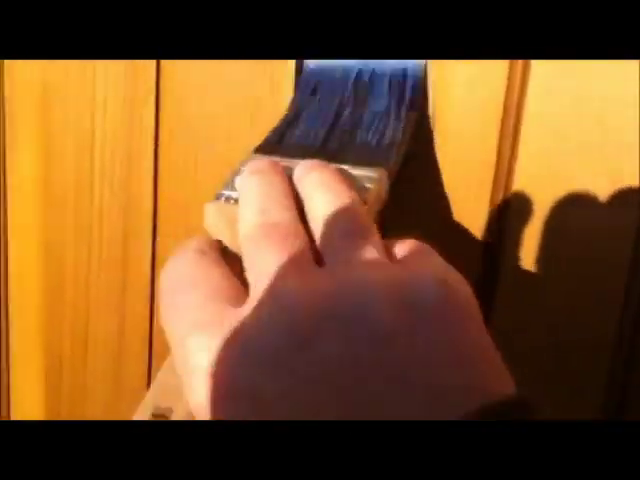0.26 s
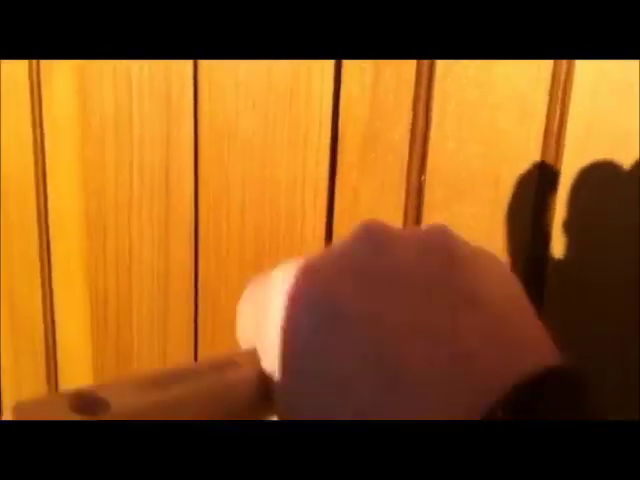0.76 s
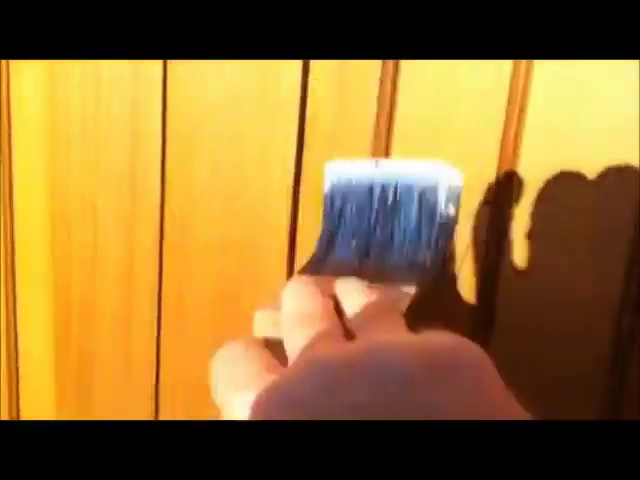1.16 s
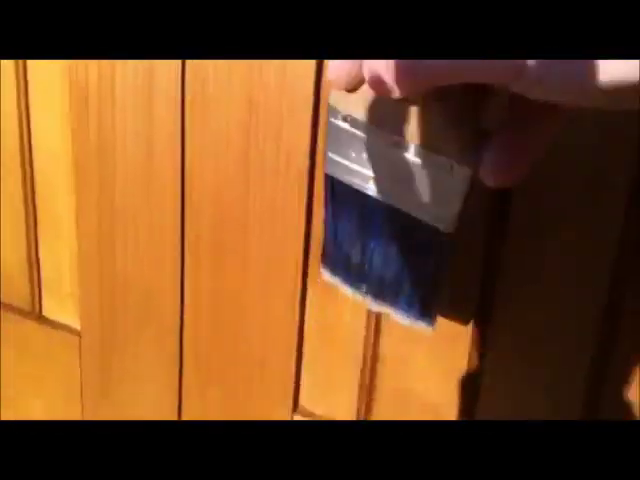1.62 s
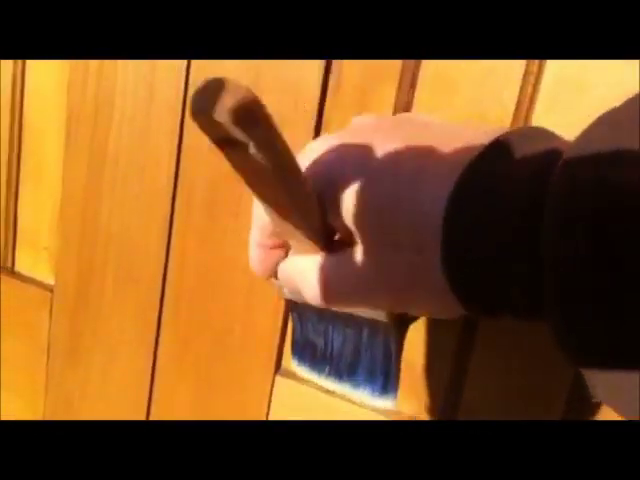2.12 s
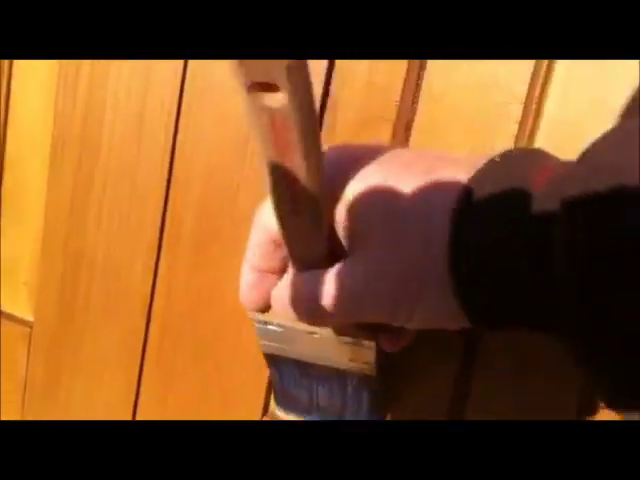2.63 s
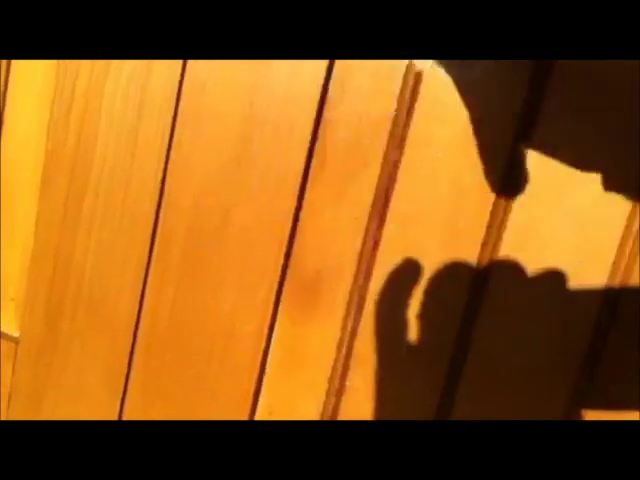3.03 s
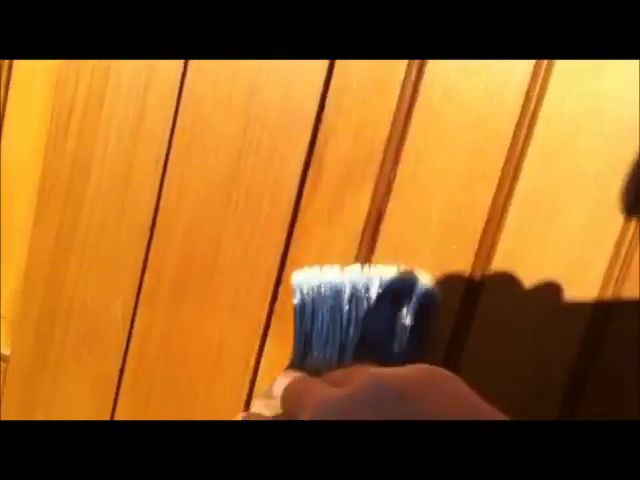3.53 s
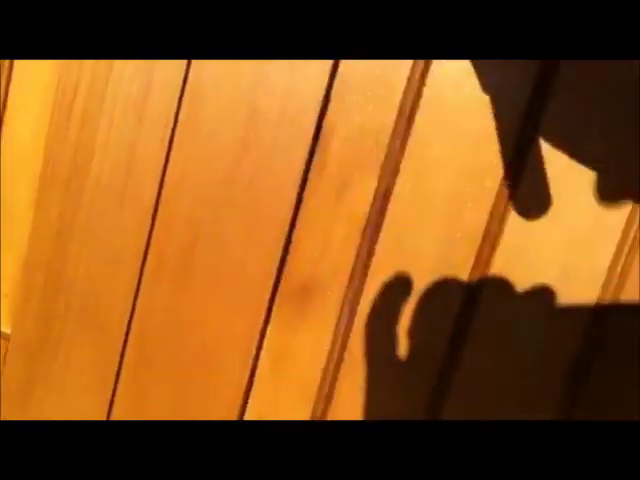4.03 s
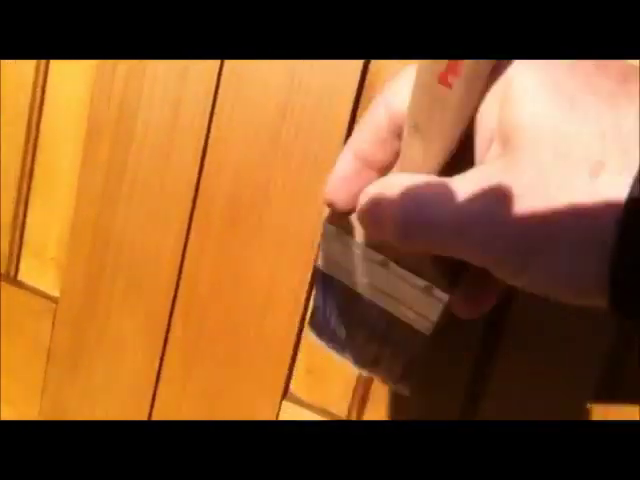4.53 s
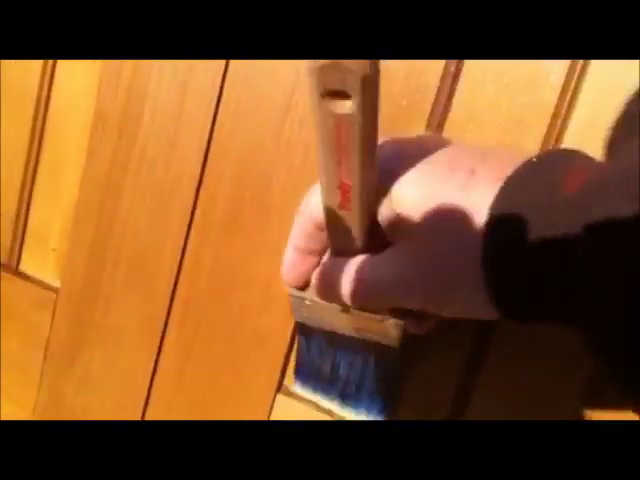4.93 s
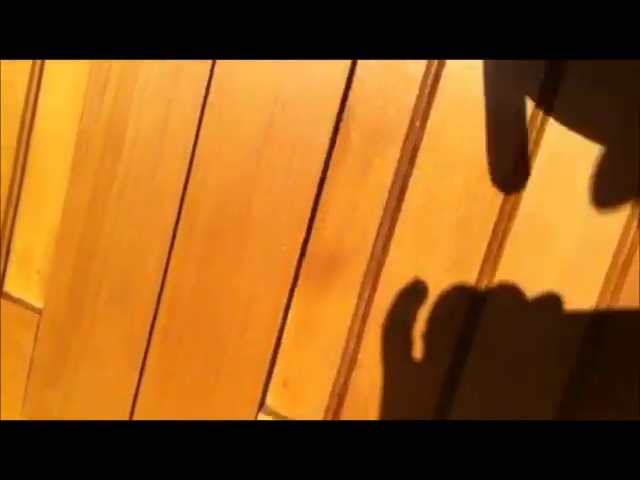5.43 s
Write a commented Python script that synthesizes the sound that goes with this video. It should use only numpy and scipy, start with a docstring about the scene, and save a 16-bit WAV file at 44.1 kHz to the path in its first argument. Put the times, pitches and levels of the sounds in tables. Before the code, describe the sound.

Close to a camera microphone outdoors, a wide brush strokes wooden boards in airy, scratchy swishes of about a third of a second. After three strokes comes a pause with rustling, a sharp metal tick, a soft bump and a tiny bird chirp. More strokes follow, with dabs and hollow bumps, then another light rustle and a last stroke cut off at the end. Low rumble and hiss stay faint underneath.

```python
"""A wide brush paints wooden wall boards outdoors, close to a camera microphone; far rumble and air hiss throughout.
0-1.6 s: a stroke's tail, then strokes: slips of bristle tips heard via tips, bristle bundle and board.
1.5-2.3 s: light rustle of sparse slips, metal ticks and wall bumps (decaying modes), a faint bird (sine glides).
2.3-4.6 s: more strokes, with dabs, bumps and shifts between.
4.6-5.66 s: rustle, bird, a bump and a dab, then a last stroke that runs to the end."""
import sys
import numpy as np
from scipy import signal
from scipy.fft import rfft, irfft, next_fast_len
from scipy.io import wavfile
from scipy.ndimage import uniform_filter1d, map_coordinates

SR = 44100
rng = np.random.default_rng(int(sys.argv[2]) if len(sys.argv) > 2 else 0)


def bounce(signal):
    """Save signal as a 16-bit WAV file at the path given by the first command-line argument."""
    frames = np.transpose(np.atleast_2d(signal))
    limited = np.clip(frames, -1, 1)
    pcm = np.round(limited * 32767).astype(np.int16)
    wavfile.write(sys.argv[1], SR, pcm)


N = 249606

# air and microphone hiss spectrum: (frequency [Hz], density [dB per Hz])
AIR_SPECTRUM = [(40, -43), (70, -34), (110, -13), (200, -18), (430, -17), (510, -5), (1200, -7),
                (2240, -10.5), (6000, -13), (15700, -13)]
# far rumble, mean level: (time [s], level [dB])
RUMBLE_LEVEL = [(0, -68.5), (.69, -73), (1.31, -68.5), (1.8, -66), (2.28, -69.5), (2.74, -70.5),
                (2.96, -57.5), (3.2, -70.5), (3.86, -66), (4.2, -72.5), (4.75, -68.5), (5.66, -66)]
# far rumble spectrum: (frequency [Hz], density [dB per Hz])
RUMBLE_SPECTRUM = [(65, -22), (100, -10), (155, -0.5), (200, 0.5), (280, -4.5), (400, -3.5), (800, -23.5)]
# bird whistles: (time [s], length [s], start [Hz], end [Hz], peak level [dB])
BIRD_CHIRPS = [(1.973, .045, 3620, 3600, -72), (2.013, .04, 4850, 4600, -62),
               (4.755, .065, 5550, 6100, -70), (4.82, .055, 7950, 8650, -66),
               (4.823, .035, 4000, 4250, -75), (4.865, .08, 4580, 4750, -74)]
# ticks of the metal band: (time [s], nominal level [dB])
TICK_EVENTS = [(1.675, -47), (1.704, -48), (1.815, -28.5)]
# metal band modes: (frequency [Hz], mean level [dB], t60 [s])
FERRULE_MODES = [(1150, -12, 0.0073), (1690, -10, 0.0061), (3400, 8, 0.0028), (5000, -6, .004),
                 (7900, -3, 0.0028)]
# wall bumps: (time [s], nominal level [dB], lowest ring [Hz], hardness [dB per octave])
BUMP_EVENTS = [(0.384, -54, 196, -11), (0.809, -43.5, 200, -13), (2.057, -49, 276, -2),
               (2.725, -35, 157.4, -1), (2.746, -34, 169, -10), (2.852, -46.5, 280, 0.5),
               (2.98, -47, 158.7, 2), (3.1, -40, 140.5, -9), (3.784, -44, 276, -0.5), (4.944, -47, 266, -8)]
# hollow wall modes: (ratio to the lowest ring, mean level before hardness [dB], t60 [s])
WALL_MODES = [(1, -12, 0.2), (1.25, 3, 0.089), (1.9, -2, 0.11), (2.6, 0, 0.081), (3.7, -1, 0.1)]
# rustle of each brush shift: (time [s], level [dB])
SHIFT_LEVELS = [
    [(1.54, -60), (1.56, -62), (1.708, -56.5), (1.808, -61.5), (1.83, -64), (1.944, -68.5), (2.05, -69)],
    [(2.14, -61), (2.155, -60), (2.23, -58), (2.27, -76)],
    [(2.729, -54), (2.745, -56), (2.85, -61)],
    [(4.2, -55), (4.25, -78), (4.3, -62)],
    [(4.6, -76), (4.71, -65.5), (4.754, -69), (4.94, -63)],
    [(5.03, -58.5), (5.05, -63), (5.13, -57.5), (5.196, -59), (5.29, -60)],
]
# each shift, at its peak, re its rustle: (scratch [dB], treble [dB])
SHIFT_COLOURS = [(1, -2.5), (-4, 1), (-2.5, 1.5), (-7, -7), (-4.5, -6), (-1, 0)]
# rustle, its scratch and its treble: (frequency [Hz], density [dB per Hz])
RUSTLE_SPECTRUM = [(180, -25), (300, -3), (490, -2.5), (600, -4.5), (1150, -4.5), (1480, -13), (1890, -4.5),
                   (2600, -7), (3030, -19), (4000, -48)]
SCRATCH_SPECTRUM = [(2300, -45), (3050, -8), (3700, 2), (4200, 1.5), (4900, 0.5), (6100, -5), (6800, -25),
                    (8800, -50)]
TREBLE_SPECTRUM = [(5000, -47), (6800, -4), (8500, -3), (12000, -3), (15700, -7.5)]
# pressure of each stroke, heard as tip hiss: (time [s], level [dB], finest tips re hiss [dB])
STROKE_LEVELS = [
    [(0.0, -49, 7), (0.008, -49, 4), (0.036, -54.5, 5), (0.054, -69, 5), (0.1, -71, -5)],
    [(0.405, -56.5, 2.5), (0.483, -42.5, 3.5), (0.555, -39, 3.5), (0.725, -51, 7.5), (0.747, -54.5, 8),
     (0.79, -86, -1)],
    [(0.812, -57.5, 6), (0.826, -53, 7.5), (0.904, -45.5, 5), (1.038, -48.5, 5.5), (1.08, -58, 8.5),
     (1.13, -87, 6)],
    [(1.2, -60, 3), (1.228, -55, 7), (1.292, -45.5, 4), (1.38, -45, 5), (1.454, -50, 6), (1.506, -49, 6),
     (1.532, -54, 7), (1.554, -66, 3), (1.57, -72, 0)],
    [(2.25, -65, -3), (2.324, -49, -5.5), (2.358, -48.5, 3), (2.392, -47, 2.5), (2.44, -60.5, 5),
     (2.462, -61, 6), (2.5, -82, 8)],
    [(2.83, -72, 1), (2.88, -51, -7), (2.988, -46.5, 4), (3.08, -45.5, 4.5), (3.292, -51, 4.5),
     (3.324, -59.5, 7), (3.38, -87, 4)],
    [(3.41, -84, 9), (3.434, -60, 0), (3.46, -53.5, 6), (3.54, -43, 2.5), (3.644, -44, 4),
     (3.674, -49.5, 5.5), (3.794, -49.5, 4.5), (3.858, -82, 2), (3.87, -61, -4)],
    [(3.87, -73, -5), (3.888, -71, -2), (3.92, -54, 4), (3.96, -49, 3), (3.988, -44.5, 3.5),
     (4.016, -44.5, 5), (4.052, -44.5, 4), (4.174, -51, 4.5), (4.25, -70.5, 0)],
    [(4.25, -69, 3), (4.282, -62, 1), (4.304, -61.5, 3), (4.328, -54, 8), (4.412, -42.5, 3.5),
     (4.506, -48.5, 6), (4.56, -51.5, 5), (4.616, -79, 6), (4.62, -73, 0)],
    [(5.27, -75, -3), (5.284, -67, -4), (5.308, -51, -7), (5.356, -47, 1), (5.472, -45, 4.5),
     (5.66, -50, 5)],
]
# short dabs as the brush is set down: (time [s], level [dB], finest tips re hiss [dB])
DAB_LEVELS = [
    [(0.364, -72, 1), (0.376, -61.5, 1), (0.405, -59.5, 5)],
    [(2.05, -53.5, -2), (2.06, -54, 5.5), (2.122, -57, 6), (2.16, -72, 3)],
    [(2.689, -56, 10), (2.703, -47, 3.5), (2.729, -43.5, 3.5)],
    [(4.94, -56.5, 9), (4.95, -51.5, 5.5), (5.008, -55, 4), (5.03, -66, 2), (5.05, -70, -11)],
]
# each stroke, then each dab; base levels re hiss: (bundle [dB], board face [dB], board body [dB],
# bundle ring at start [Hz], at end [Hz], its base sharpness [dB],
# deepest bristle bend at [s], bend length [s], bend depth [0-2])
GESTURE_COLOURS = [(-6.5, -14.5, -14.5, 2120, 1700, 3.9, 0.047, .03, .5),
                   (-3, -11, -18, 1830, 2080, 4.6, 0.81, .03, 1),
                   (-5.5, -11.5, -18.5, 2030, 2000, 4.3, 0.947, 0.043, 1.5),
                   (-5, -11.5, -16, 2260, 1900, 1.8, 1.33, .05, 0.55),
                   (-2.5, -11.5, -9, 1850, 2160, 4.2, 2.38, .03, 0.5),
                   (-3, -12, -12.5, 1930, 1660, 5.4, 3.17, 0.052, 0.96),
                   (-5, -11.5, -19.5, 1530, 2250, 2.9, 3.63, 0.081, 0.81),
                   (-3.5, -12, -16, 1840, 1750, 4.8, 4.09, .07, 0.94),
                   (-5.5, -13, -17, 1570, 2130, 4, 4.45, 0.043, 1.4),
                   (-4, -10.5, -11.5, 1900, 1750, 6, 5.57, 0.047, 1.8),
                   (2.5, -9, -5.5, 1440, 1620, 13, .378, .02, 1.1),
                   (3, -6.5, -2.5, 1740, 1920, 7.5, 2.11, 0.045, 0.79),
                   (1, -7, -8, 1900, 1780, 7, 2.727, 0.013, 1.2),
                   (1.5, -8, -7, 1740, 1900, 6, 4.945, .02, 1.7)]
# board ring as the brush moves along; each stroke, then each dab:
# (start [Hz], end [Hz], sharpness [dB])
BOARD_SWEEPS = [(900, 900, 2), (690, 900, 3.4), (776, 600, 3.4), (640, 820, 2.5), (620, 1100, 6.6),
                (700, 1300, 7.6), (650, 800, 4), (600, 1400, 2.9), (700, 960, 2.5), (700, 1300, 4.6),
                (700, 600, 2), (600, 620, 4.5), (600, 530, 6.5), (700, 970, 1.6)]
# tips, finest tips, bristle bundle: (frequency [Hz], density [dB per Hz])
TIP_SPECTRUM = [(2000, -68), (2900, -4.5), (3600, 0.5), (4500, 0), (5600, -0.5), (6500, -6.5),
                (8000, -15.5), (12000, -17)]
FINE_TIP_SPECTRUM = [(4500, -32), (6500, -8.5), (8000, -3), (11400, -1.5), (14500, -3), (15700, -7.5)]
BUNDLE_SPECTRUM = [(1000, -44), (1300, -26), (1500, -3.5), (2000, 0), (2650, 1.5), (2950, -10.5),
                   (3600, -27), (6000, -48)]
# board face; board body over its hollow: (frequency [Hz], density [dB per Hz])
FACE_SPECTRUM = [(450, -48), (750, -9.5), (1000, -2), (1350, 3), (1600, -5.5), (2600, -97)]
BODY_SPECTRUM = [(150, -25), (300, -4.5), (450, -3.5), (600, 1.5), (750, -5), (1000, -9), (1800, -63)]

AIR_DB = -65.5
TOP_HZ = 15830
SCRATCH_DB_PER_RUSTLE_DB = 0.6
LANDING_S, LANDING_DB = 0.052, 3  # body boom as the brush lands: 1/e time, initial lift
BODY_LAG_SHARE = 0.37  # share of the pressure swing that the body does not follow
BODY_FADE_DB = 3  # body lost by the end of a stroke
BEND_FACE_DB, BEND_BUNDLE_DB, BEND_SHARP_DB = 3.5, 2.5, 4  # added by a bend of depth 1


def amp(db):
    """Decibels to amplitude."""
    return 10 ** (np.asarray(db) / 20)


def unit(x):
    """Scale to rms 1."""
    return x / np.sqrt(np.mean(x ** 2) + 1e-20)


def filtered(x, response):
    """Multiply the spectrum by response(Hz), zero phase."""
    size = next_fast_len(N + 8192)
    return irfft(rfft(x, size) * response(np.fft.rfftfreq(size, 1 / SR)), size)[..., :N]


def coloured(x, spectrum):
    """Filter through (Hz, dB) points on a log frequency axis, then set rms 1."""
    hz, db = np.transpose(spectrum)
    return unit(filtered(x, lambda f: amp(np.interp(np.log(f + 1), np.log(hz), db))))


def wobble(knots_per_s):
    """Smooth random curve through normal knots."""
    knots = rng.standard_normal(int(N * 200 / SR) + 4)
    return map_coordinates(knots, [np.arange(N) * knots_per_s / SR])


def slips(spike_db, patchy_db):
    """Dense tiny slips of uneven size; bunches of bristles make patches in time and pitch."""
    pops = rng.standard_normal(N) * amp(spike_db * rng.exponential(size=N))
    z = signal.stft(pops, nperseg=256)[2]
    field = uniform_filter1d(rng.standard_normal(z.shape), size=2, axis=0)
    field = uniform_filter1d(field, size=18, axis=1)
    return signal.istft(z * amp(patchy_db * unit(field)), nperseg=256)[1][:N]


def ringing(x, centre_hz, width_oct, lift_db):
    """A moving resonance lifts the band round its centre; the gain is balanced to hold the mean level."""
    hz, t_s, z = signal.stft(x, SR, nperseg=512)
    now = np.minimum((t_s * SR).astype(int), N - 1)
    offset_oct = np.log2((hz[:, None] + 1) / centre_hz[now])
    lift = amp(lift_db[now] * np.exp(-(offset_oct / width_oct) ** 2))
    weight = np.mean(abs(z) ** 2, axis=1, keepdims=True)
    lift = lift / np.sqrt(np.sum(weight * lift ** 2, axis=0) / np.sum(weight))
    return signal.istft(z * lift, SR, nperseg=512)[1][:N]


def played(tables, rows):
    """Per sample: gain, dB below peak (at most 30), seconds and share gone by, row of the latest gesture."""
    t_s = np.arange(N) / SR
    starts, ends = np.array([[table[0][0], table[-1][0]] for table in tables]).T
    order = np.argsort(starts)
    latest = np.searchsorted(starts[order], t_s, side="right") - 1
    now = order[np.maximum(latest, 0)]
    levels = [np.interp(t_s, *np.transpose(table)[:2], left=-200, right=-200) for table in tables]
    level_db = np.max(levels, axis=0)
    peak_db = np.array([np.max(table, axis=0)[1] for table in tables])[now]
    below_db = np.minimum(peak_db - level_db, 30)
    since_s = np.maximum(t_s - starts[now], 0)
    gone = np.minimum(since_s / (ends - starts)[now], 1)
    gain = uniform_filter1d(amp(level_db), size=130)  # 3 ms smoothing
    return gain, below_db, since_s, gone, np.array(rows)[now].T


def outdoors():
    """Steady air and microphone hiss under a wavering low rumble, both shaped noise."""
    time_s, db = np.transpose(RUMBLE_LEVEL)
    level_db = np.interp(np.arange(N) / SR, time_s, db) + 1.5 * wobble(7)
    rumble = amp(level_db) * coloured(rng.standard_normal(N), RUMBLE_SPECTRUM)
    return rumble + amp(AIR_DB) * coloured(slips(spike_db=1.2, patchy_db=0.0), AIR_SPECTRUM)


def bird():
    """Short far whistles: sines gliding linearly in frequency under a Hann envelope."""
    out = np.zeros(N + SR)
    for time_s, length_s, from_hz, to_hz, db in BIRD_CHIRPS:
        n = int(length_s * SR)
        cycles = np.cumsum(np.linspace(from_hz, to_hz, n)) / SR
        out[round(time_s * SR):][:n] += amp(db) * np.hanning(n) * np.sin(2 * np.pi * cycles)
    return out[:N]


def blow(db, modes, rise_s):
    """One blow rings decaying modes, each at a new random strength."""
    t_s = np.arange(SR // 4) / SR
    ring = 0
    for hz, level_db, t60_s in modes:
        decay_db = level_db + rng.normal(0, 1.5) - 60 * t_s / t60_s
        ring = ring + amp(decay_db) * np.sin(2 * np.pi * hz * t_s)
    return amp(db - 7) * ring * (1 - np.exp(-t_s / rise_s))


def knocks():
    """Dry ticks of the metal band and soft bumps on the hollow wall, as struck modes."""
    out = np.zeros(N + SR)
    for time_s, db in TICK_EVENTS:
        start = round(time_s * SR)
        out[start:][:SR // 4] += blow(db, FERRULE_MODES, rise_s=.00004)
        out[start + 2:][:2] += amp(db + 2.0) * np.array([1, -.4])  # broadband contact snap
    for time_s, db, low_hz, hard_db in BUMP_EVENTS:
        # a harder bump reaches the higher modes
        modes = [(low_hz * k, level + hard_db * np.log2(k), t60_s) for k, level, t60_s in WALL_MODES]
        out[round(time_s * SR):][:SR // 4] += blow(db, modes, rise_s=0.0019)
    # small bodies radiate no deep bass
    return filtered(out[:N], lambda hz: hz ** 2 / (hz ** 2 + 60 ** 2))


def shifts():
    """A sparser, spikier rustle of slips while the brush barely touches; the louder, the brighter."""
    gain, below_db, _, _, (scratch_db, treble_db) = played(SHIFT_LEVELS, SHIFT_COLOURS)
    rub = slips(spike_db=2.2, patchy_db=1.5) * amp(0.68 * wobble(45))
    scratch = amp(scratch_db) * coloured(rub, SCRATCH_SPECTRUM)
    treble = amp(treble_db) * coloured(rub, TREBLE_SPECTRUM)
    bright = amp(-SCRATCH_DB_PER_RUSTLE_DB * below_db) * (scratch + treble)
    return gain * (coloured(rub, RUSTLE_SPECTRUM) + bright)


def brush():
    """One stream of slips is heard from the tips, through the bristle bundle and through the board."""
    gestures = STROKE_LEVELS + DAB_LEVELS
    gain, below_db, since_s, gone, colour = played(gestures, np.hstack([GESTURE_COLOURS, BOARD_SWEEPS]))
    bundle_db, face_db, body_db, from_hz, to_hz, sharp_db = colour[:6]
    bend_s, bend_length_s, depth, board_from_hz, board_to_hz, board_sharp_db = colour[6:]
    t_s = np.arange(N) / SR
    bend = depth * np.exp(-((t_s - bend_s) / bend_length_s) ** 2)

    drag = slips(spike_db=0.8, patchy_db=1.2) * amp(0.27 * wobble(60))  # wood grain shakes the drag
    fine_time_s, _, fine_points_db = np.transpose(sorted(sum(gestures, [])))
    fine_db = np.interp(t_s, fine_time_s, fine_points_db)
    tips = coloured(drag, TIP_SPECTRUM) + amp(fine_db) * coloured(drag, FINE_TIP_SPECTRUM)

    # the bundle's ring glides steadily from start to end pitch over each gesture; a bend sharpens it
    bundle_hz = from_hz + (to_hz - from_hz) * gone
    lift_db = np.clip(sharp_db + BEND_SHARP_DB * bend, 0, 16)
    bundle = ringing(coloured(drag, BUNDLE_SPECTRUM), bundle_hz, width_oct=.13, lift_db=lift_db)
    bundle = amp(bundle_db + BEND_BUNDLE_DB * bend) * bundle

    body_db = body_db + BODY_LAG_SHARE * below_db - BODY_FADE_DB * gone
    body_db = body_db + LANDING_DB * np.exp(-since_s / LANDING_S)
    face = amp(face_db + BEND_FACE_DB * bend) * coloured(drag, FACE_SPECTRUM)
    body = amp(body_db) * coloured(drag, BODY_SPECTRUM)
    board_hz = board_from_hz + (board_to_hz - board_from_hz) * gone
    board = ringing(face + body, board_hz, width_oct=0.2, lift_db=np.clip(board_sharp_db, 0, 14))
    return gain * (tips + bundle + board)


def scene():
    """Sum all sources, the same in both channels."""
    mono = outdoors() + bird() + knocks() + shifts() + brush()
    return np.array([mono, mono])


def record(dry):
    """The camera keeps nothing above its band limit; its converter sits slightly below zero."""
    return filtered(dry, lambda hz: hz < TOP_HZ) - .0002


dry = scene()
out = record(dry)
bounce(out)
```